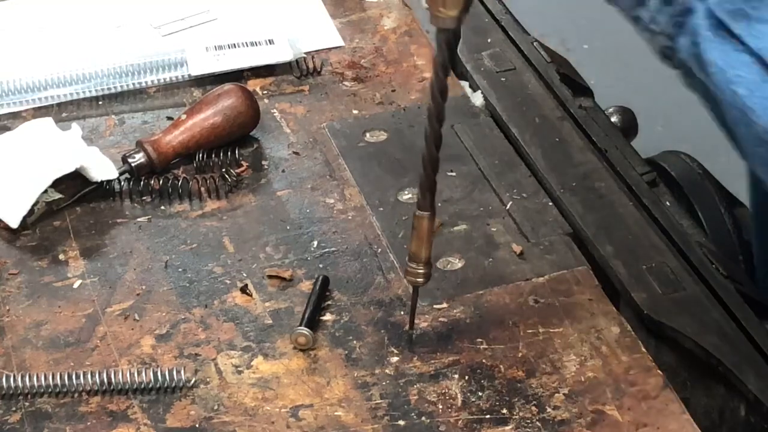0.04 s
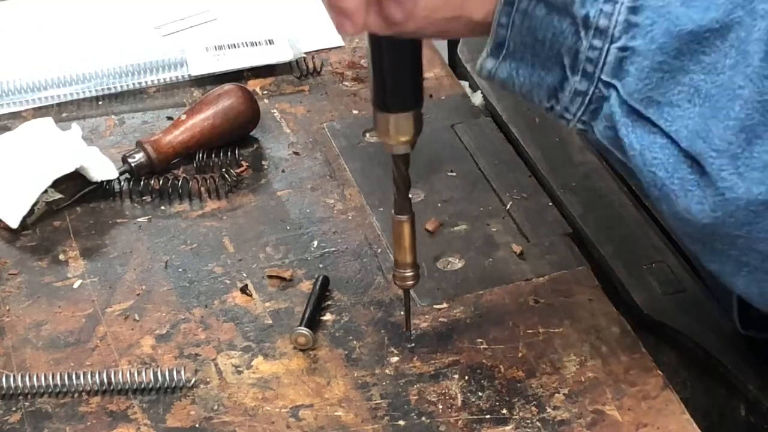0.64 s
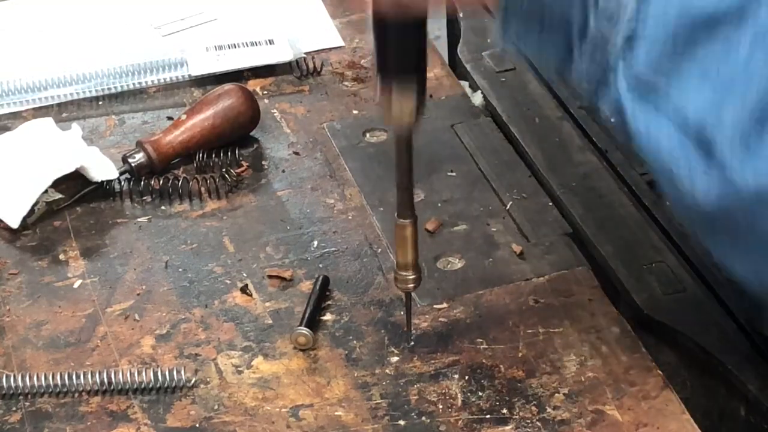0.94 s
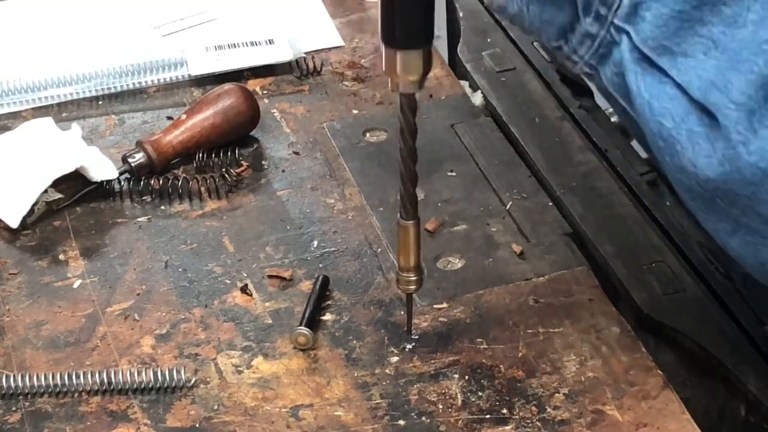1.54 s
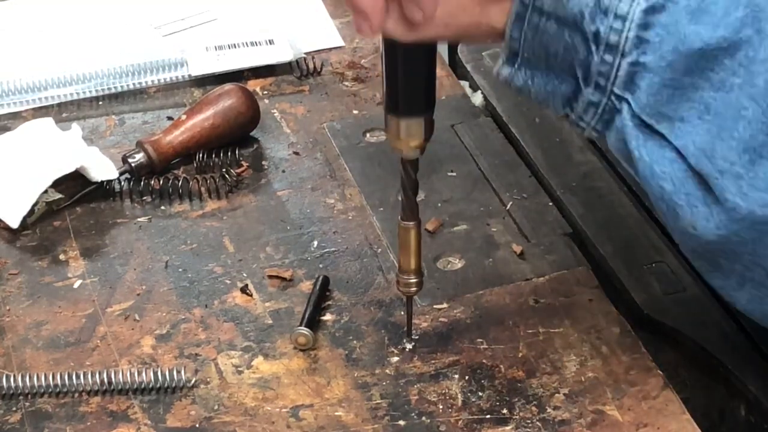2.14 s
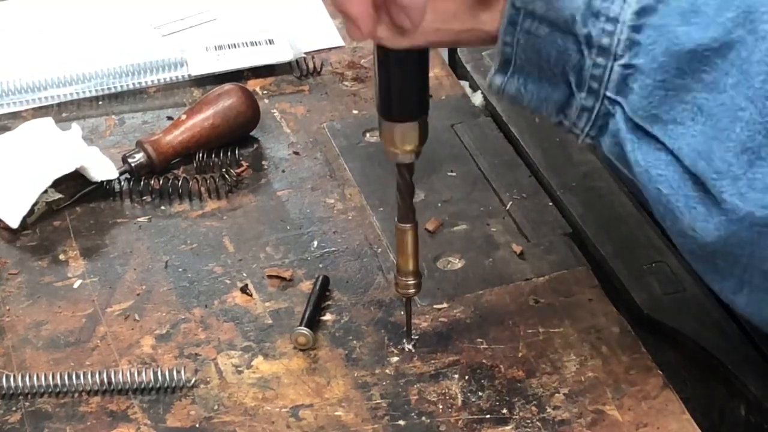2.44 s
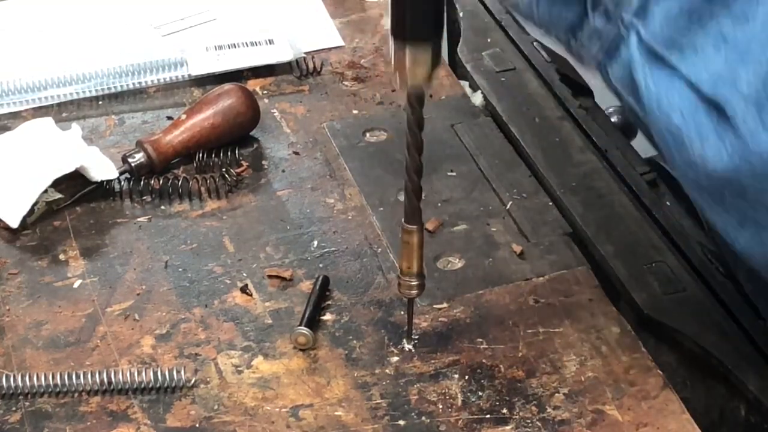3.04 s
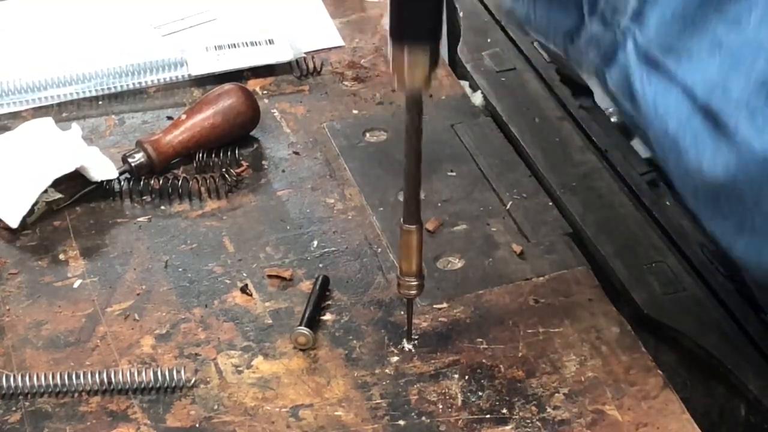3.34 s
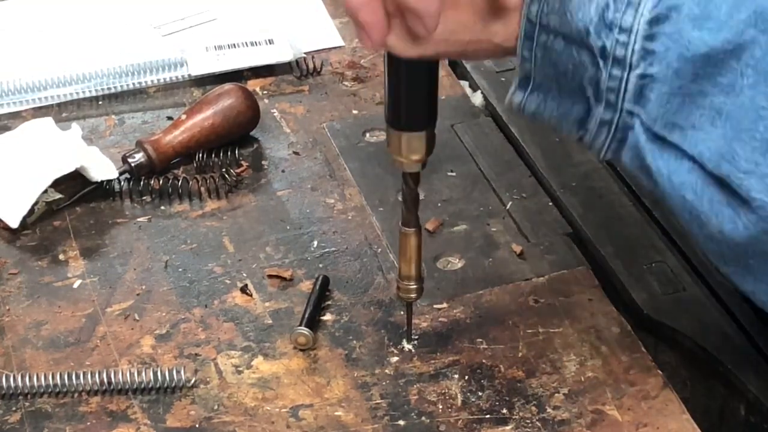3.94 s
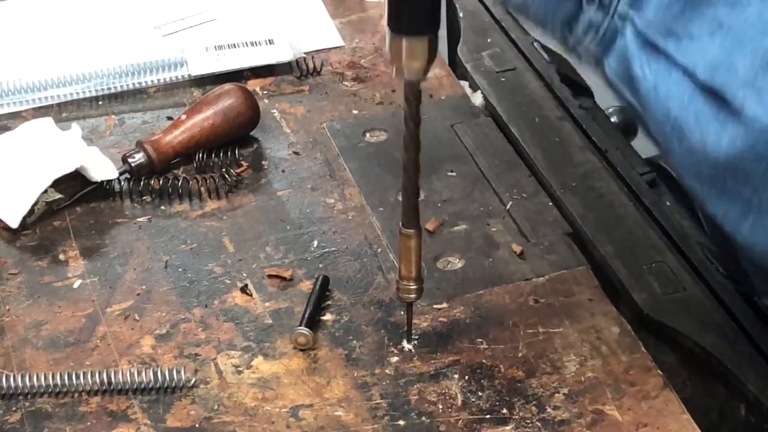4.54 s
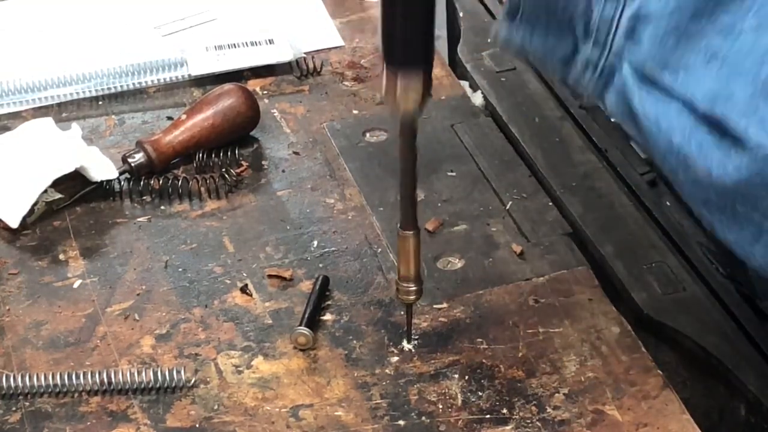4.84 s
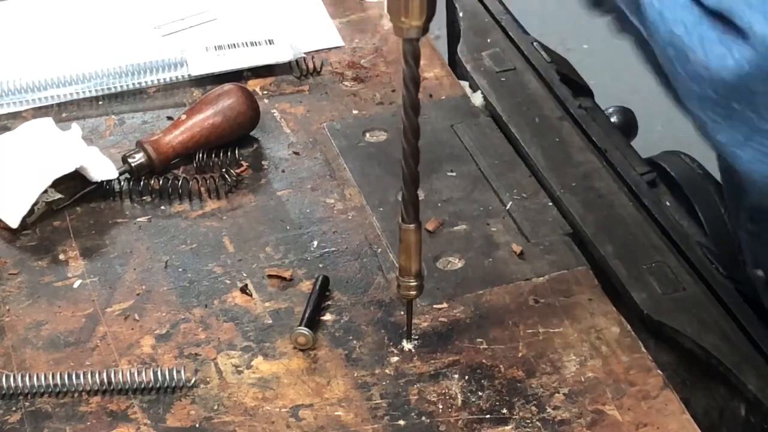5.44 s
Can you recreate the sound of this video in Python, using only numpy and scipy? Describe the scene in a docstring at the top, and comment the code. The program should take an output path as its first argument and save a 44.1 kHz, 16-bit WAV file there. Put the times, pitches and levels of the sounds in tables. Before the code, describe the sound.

Rapid metallic clicking, wooden knocking and gritty grinding from a hand push drill boring into a workbench, then its handle snaps back with a clang.

```python
"""Steel clicks, wooden knocks and gritty scrapes go back and forth: a push drill bores into a bench top.
Each time the handle changes direction, a loose nut inside clicks and the bench knocks. Then the nut
scrapes along a spiral shaft while the bit grinds the wood. At the end a spring throws the handle
against its stop with a clang. It all sounds close by, in a small workshop with a soft, steady hush."""
import sys
import numpy as np
from scipy import signal
from scipy.fft import rfft, irfft
from scipy.io import wavfile
from scipy.ndimage import uniform_filter1d

SR = 44100
rng = np.random.default_rng(int(sys.argv[2]) if len(sys.argv) > 2 else 0)


def transcribe(signal):
    """Save signal, clipped to [-1, 1], as a 16-bit WAV file at the path in sys.argv[1]."""
    frames = np.atleast_2d(signal).T
    limited = np.clip(frames, -1, 1)
    pcm = np.round(limited * 32767).astype(np.int16)
    wavfile.write(sys.argv[1], SR, pcm)


N = 251615

# When things happen. Levels are relative: the functions add their own gains.
# The handle turns to go down (push) or up (return): time_s, tick_db, pitch_hz, clack_db, thud_db, length_s
PUSH_STROKES = [(0.162, -22.5, 4000, -38, -21, .13), (0.8902, -27, 4300, -31.5, -30, 0.14),
                (1.259, -14.5, 4460, -25, -26, 0.12), (1.6281, -5, 5080, -25, -24, 0.097),
                (1.9918, -2.5, 5160, -22.5, -24, .1), (2.333, -9, 4570, -24.5, -31, 0.14),
                (2.6927, -13, 4760, -30, -22.5, .14), (3.0545, -4.5, 4510, -22, -21.5, .15),
                (3.4316, -9.5, 4640, -20.5, -23, .13), (3.816, -11, 4650, -22.5, -26, .17),
                (4.219, -15, 4560, -30.5, -21, .14), (4.6024, -10, 4550, -22.5, -26.5, 0.14),
                (4.961, -8.5, 4540, -21, -24, .16)]
RETURN_STROKES = [(0.6846, -15.5, 3630, -42, -29.5, 0.16), (1.088, -21, 4050, -27.5, -25.5, 0.13),
                  (1.452, -17.5, 5320, -27.5, -23.5, 0.1), (1.817, -22, 5200, -32.5, -24, .11),
                  (2.171, -24, 3680, -26, -19, 0.14), (2.5369, -20, 5100, -24, -19, 0.16),
                  (2.8905, -23.5, 5200, -31.5, -23.5, .17), (3.2637, -16, 3650, -19.5, -20, .16),
                  (3.644, -10.5, 3640, -19, -25, 0.16), (4.0282, -8.5, 4400, -20, -19, 0.17),
                  (4.4359, -12.5, 3900, -20.5, -23.5, .17), (4.7919, -14, 4070, -18.5, -24, 0.18),
                  (5.1908, -6, 4180, -19.5, -17.5, .19)]
# The nut slides without changing direction: time_s, scrape_db, length_s
GENTLE_SLIDES = [(0.124, -52.5, 0.11), (0.452, -43.5, 0.2), (5.238, -40, 0.089), (5.559, -43.5, 0.14)]
# Loose parts touch: start_s, tick_db, clack_db
LOOSE_TICKS = [(0.154, -37, -53), (0.304, -31, -48), (0.4404, -33, -51), (0.9048, -15.5, -38),
               (1.265, -22, -44), (1.6037, -19.5, -56), (1.813, -31, -28), (1.886, -29.5, -51),
               (1.977, -21.5, -51), (1.9967, -10, -15), (2.3785, -24, -39), (2.7355, -17.5, -31),
               (3.0856, -19, -42), (4.941, -20, -29), (5.5175, -32, -32), (5.5456, -27, -31),
               (5.5893, -47, -19.5), (5.5938, -35, -21)]
# The arm or the tool jolts the whole bench: start_s, level_db
BENCH_JOLTS = [(.158, -35), (5.298, -14.5), (5.565, -29.5)]
# The dry spindle (the turning shaft) squeaks: start_s, length_s, pitch_hz, level_db
SPINDLE_SQUEAKS = [(0.672, 0.033, 1770, -28), (0.933, 0.011, 1870, -32)]
# The handle hits its stop and bounces: start_s, level_db
STOP_HITS = [(5.2956, 4.5), (5.3054, -9), (5.3125, -8), (5.3192, -9), (5.359, -11.5)]
# The hand leans on the tool, drills, then lifts the bit out: time_s, load_db
HAND_LOAD = [(.2, -11.5), (.55, 0), (2.0, 1.5), (2.8, -2.5), (4.3, 0), (5.05, -5), (5.2, -6), (5.6, -19)]

# Modes are the notes a struck object rings at: pitch_hz, level_db, fade_s (the time to fall by 60 dB)
BENCH_TOP_MODES = [(129.3, -29.5, 0.99), (158.5, -23.5, 0.19), (235, -11.5, 0.3), (262.2, -15.5, 0.36),
                   (306.6, -14, 0.34), (388, -7, 0.28), (405.4, -2.5, 0.16), (476.1, -1.5, 0.11),
                   (507, -8.5, 0.18), (611, -11.5, 0.099), (667, -1, 0.062), (770, -40, 0.07),
                   (838.6, -6, 0.092), (977, -21.5, 0.055), (1010, -24, 0.035), (1243, -13.5, 0.081)]
BENCH_FRAME_MODES = [(78, -28, 0.44), (128, -3, 0.27), (167.5, -2, 0.14), (217.3, 4, 0.18), (279, -7, 0.13),
                     (332, -3, 0.061), (391, 7.5, 0.11), (458, 7.5, 0.074), (634, 3.5, 0.099)]
WHOLE_TOOL_MODES = [(1510, -21, 0.11), (1980, -15.5, .18), (2100, 6, .11), (2120, 2, 0.24),
                    (2274, 9.5, 0.11), (3330, 8, 0.065), (5700, -6, .13), (6070, -10, .13), (6330, -6, 0.2),
                    (7300, -11, .14), (11200, -21, .15)]

# A spectrum says how strong a sound is from low to high: frequency_hz, level_db
HUSH_SPECTRUM = [(15, -30), (25, -22.5), (107, 9), (160, -0.5), (445, -2), (1300, -8.5), (2060, -10),
                 (2240, -13), (2770, -12), (5430, -16), (5890, -12.5), (6740, -17.5), (15500, -21.5)]  # the quiet workshop
ROCKING_SPECTRUM = [(25, -39.5), (58, -8), (74, 3), (86, -18), (112, -13), (130, -0.5), (240, -10.5),
                    (400, -10), (1000, -55)]  # the bench rumbling under the arm
DOWN_SCRAPE_SPECTRUM = [(300, -16), (900, -4.5), (1450, -4.5), (1900, 1.5), (2650, -4), (3500, -2.5),
                        (4600, -5), (6600, -12), (9500, -15.5), (13000, -19), (16000, -26)]  # the nut sliding down the spiral
UP_SCRAPE_SPECTRUM = [(300, 5), (900, -1.5), (1450, -3.5), (2000, 5), (2650, -3.5), (4500, -4.5),
                      (6600, -12), (9500, -15), (13000, -18.5), (16000, -25)]  # the nut sliding back up
CHIP_SPECTRUM = [(80, -37), (170, -15), (400, 9), (600, -2), (900, 3.5), (1250, -11.5), (1700, -1),
                 (4000, -54)]  # wood chips crunching
SNAP_SPECTRUM = [(1000, -49), (3500, -12), (5500, 2), (8000, -1), (11000, -0.5), (16000, -1.5)]  # the sharp tick of a loose part
SLEEVE_SPECTRUM = [(500, -41), (1100, -23), (1500, -3.5), (1750, -3), (2080, 2.5), (2450, -5), (3200, -11),
                   (6000, -33)]  # the clack of the sleeve around the shaft
SHAFT_SPECTRUM = [(900, -41), (2800, -4.5), (4400, -4), (5400, 2.5), (6500, -4.5), (8300, -10),
                  (9900, -6.5), (11500, -18.5), (13500, -15.5), (16000, -29)]  # the tick of the steel shaft
CHATTER_SPECTRUM = [(800, -13), (2200, -1), (6000, -1.5), (16000, -13)]  # the loose nut chattering
SPRING_SPECTRUM = [(400, 2), (1300, -6), (2100, -7), (2800, -3), (4200, -7.5), (6000, -4), (8500, -12.5),
                   (12000, -11), (16000, -29)]  # the coil spring rattling
WHIRR_SPECTRUM = [(430, -45), (640, 3.5), (730, -0.5), (830, 5.5), (1030, 2.5), (1240, 0.0),
                  (1450, -13.5), (3000, -55)]  # the spindle buzzing
CRACK_SPECTRUM = [(500, -17.5), (3000, 2.0), (10000, -5), (16000, -7.5)]  # steel hitting steel

# How long the workshop's echo takes to fall by 60 dB: frequency_hz, fade_s
ROOM_FADE = [(80, 1), (200, 0.88), (500, 0.3), (2000, 0.22), (6000, 0.25), (15000, 0.19)]

BRIGHTEN, FIRM_TICK_DB = 0.34, -10.5  # a tick tilts brighter by 0.34 dB an octave for each dB above firm
WHIRR_PER_CLACK, FIRM_CLACK_DB = 1.52, -20.5  # dB per dB: a harder turn flings the spindle round faster
SCRAPE_PER_LOAD = 0.58  # dB per dB: the spring keeps the nut rubbing even under a light hand


def amp(db):
    """Turns decibels into a number to multiply by."""
    return 10 ** (np.asarray(db) / 20)


def unit(x):
    """Scales a signal to an average (rms) level of 1."""
    return x / np.sqrt(np.mean(x ** 2) + 1e-20)


def read(table, hz):
    """Looks up a value between a table's rows, with octaves evenly spaced."""
    table_hz, value = np.transpose(table)
    return np.interp(np.log(hz + 1), np.log(table_hz + 1), value)


def add(mix, start_s, sound):
    """Mixes a sound in at the given time."""
    part = mix[max(round(start_s * SR), 0):][:len(sound)]
    part += sound[:len(part)]


def colour(x, spectrum):
    """Shapes a steady noise with a spectrum, at an average level of 1."""
    hz = np.fft.rfftfreq(len(x), 1 / SR)
    return unit(irfft(rfft(x) * amp(read(spectrum, hz)), len(x)))


def load_db(time_s):
    """How hard the hand presses the bit into the wood."""
    return np.interp(time_s, *np.transpose(HAND_LOAD))


def grains(per_s, spread_db):
    """Tiny slips at random moments, a few of them large."""
    size = amp(spread_db * np.minimum(rng.exponential(1, N), 4))
    return size * rng.choice([-1., 1.], N) * (rng.random(N) < per_s / SR)


def ring(modes, detune, spread_db, tilt_db=0, travel_s=0):
    """A struck object rings, a little differently each time; tilt_db is the boost for each octave up."""
    hz, db, fade_s = np.transpose(modes)[:, :, None]
    delay_s = travel_s * np.sqrt(hz.mean() / hz)  # low bending waves travel slower and arrive late
    t = np.maximum(np.arange(SR // 2) / SR - delay_s, 0)
    shift, weight, side = rng.standard_normal((3, len(hz), 1))
    size = amp(db + spread_db * weight + tilt_db * np.log2(hz / hz.mean()))
    tones = np.sign(side) * np.sin(2 * np.pi * hz * (1 + detune * shift) * t)
    build_up = 1 - np.exp(-2 * (hz * t) ** 2)  # each note takes about a cycle to get going
    return (size * build_up * amp(-60 * t / fade_s) * tones).sum(0) / np.linalg.norm(size)


def tap(spectrum, ripple_db, rough_db, rough_s):
    """One dry tap, a little different each time, roughened as the two surfaces grate."""
    hz = np.fft.rfftfreq(2048, 1 / SR)
    ripple = unit(uniform_filter1d(rng.standard_normal(len(hz)), size=40))
    log_gain = np.log(amp(read(spectrum, hz) + ripple_db * ripple))
    # turn the spectrum into a pulse with its energy at the very start (minimum phase)
    mirrored = np.concatenate([log_gain, log_gain[-2:0:-1]])
    pulse = np.fft.ifft(np.exp(np.conj(signal.hilbert(mirrored)))).real
    contact = rng.standard_normal(len(pulse)) * np.exp(-np.arange(len(pulse)) / SR / rough_s)
    contact *= amp(rough_db) / np.linalg.norm(contact)
    contact[0] += 1  # the clean first touch
    sound = signal.fftconvolve(contact, pulse)[:len(pulse)]
    return sound / np.linalg.norm(sound)


def background():
    """The bench rumbles softly as it rocks under the arm, and the room has a steady hush."""
    rocking = colour(rng.standard_normal(N), ROCKING_SPECTRUM)
    hush = colour(rng.standard_normal(N), HUSH_SPECTRUM)
    return amp(-54) * rocking + amp(-54.5) * hush


def nut_scrape(spectrum):
    """The brass nut slips along steel grooves; the tone shifts as the touching point moves."""
    bands = signal.stft(grains(per_s=5500, spread_db=3.2), SR, nperseg=256)[2]
    patches = uniform_filter1d(rng.standard_normal(bands.shape), size=3, axis=0)  # smooth across pitch
    shift_db = 3 * unit(uniform_filter1d(patches, size=7, axis=1))  # and across time
    slips = signal.istft(bands * amp(shift_db), SR, nperseg=256)[1][:N]
    return colour(slips, spectrum)


def bit_grind(tilt_db):
    """The cutting edges catch on wood fibres and shake the bench; chips crunch."""
    catches = grains(per_s=930, spread_db=2.5)
    bench = ring(BENCH_TOP_MODES, detune=0.011, spread_db=0.5, tilt_db=tilt_db)
    shaking = unit(signal.oaconvolve(catches, bench)[:N])
    chips = colour(grains(per_s=1200, spread_db=4), CHIP_SPECTRUM)
    return unit(shaking + amp(-8) * chips)


def slides():
    """The nut slides gently: scraping and grinding swell and fade without a click."""
    scrape, grind = np.zeros((2, N))
    for s, scrape_db, length_s in GENTLE_SLIDES:
        arch = np.sqrt(np.hanning(int((length_s + 0.021) * SR)))
        add(scrape, s - 0.03, amp(scrape_db) * arch)
        add(grind, s - 0.03, amp(-35 + load_db(s + length_s / 2)) * arch)
    return scrape * nut_scrape(DOWN_SCRAPE_SPECTRUM) + grind * bit_grind(tilt_db=-3.5)


def stroke(length_s, lead_s, lead_db, sag_db, start_db):
    """The loudness of one stroke: a light touch, then full rubbing that speeds up and slows to rest."""
    t = np.arange(-lead_s, length_s, 1 / SR)
    progress = np.clip(t / length_s, 0, 1)
    contact = np.interp(t, [-lead_s, -lead_s * 0.92, -0.003, 0.003],
                        [0, amp(lead_db - 6), amp(lead_db - 1.5), 1])
    slowing = np.sqrt(np.clip(1 - progress ** 4, 0, 1)) ** 3
    return contact * amp(start_db * (1 - progress) ** 4 - sag_db * progress) * slowing


def pumping(strokes, scrape_spectrum, click_db, ring_db, thud_tilt_db, whirr_db, whirr_s,
            lead_s, lead_db, start_db, scrape_db, scrape_sag_db, grind_db, grind_sag_db, grind_tilt_db):
    """All strokes one way: a click, thud and whirr, then scraping and grinding that follow the load."""
    hits, scrape, grind = np.zeros((3, N))
    for s, tick_db, pitch_hz, clack_db, thud_db, length_s in strokes:
        add(hits, s, amp(click_db) * steel_click(tick_db, pitch_hz, clack_db, ring_db))
        thud = ring(BENCH_TOP_MODES, detune=0.035, spread_db=3, tilt_db=thud_tilt_db, travel_s=0.0012)
        add(hits, s, amp(thud_db) * thud)
        add(hits, s, amp(whirr_db + WHIRR_PER_CLACK * (clack_db - FIRM_CLACK_DB)) * whirr(whirr_s))
        scrape_shape = stroke(length_s, lead_s, lead_db, scrape_sag_db, start_db)
        grind_shape = stroke(length_s, lead_s, lead_db, grind_sag_db, start_db)
        add(scrape, s - lead_s, amp(scrape_db + SCRAPE_PER_LOAD * load_db(s)) * scrape_shape)
        add(grind, s - lead_s, amp(grind_db + load_db(s)) * grind_shape)
    return hits + scrape * nut_scrape(scrape_spectrum) + grind * bit_grind(grind_tilt_db)


def loose_parts():
    """Loose parts touch, each time with a sharp snap and a lower clack."""
    out = np.zeros(N)
    for s, tick_db, clack_db in LOOSE_TICKS:
        add(out, s, amp(tick_db + 6.5) * tap(SNAP_SPECTRUM, ripple_db=1.5, rough_db=-5, rough_s=0.0005))
        add(out, s, amp(clack_db + 13) * tap(SLEEVE_SPECTRUM, ripple_db=8, rough_db=1, rough_s=0.0031))
    return out


def jolts():
    """The heavy bench frame is slow to move, so each jolt swells into a low boom."""
    out = np.zeros(N)
    t = np.arange(SR // 2) / SR
    swell = 1 - np.exp(-(t / 0.0074) ** 2)
    for s, db in BENCH_JOLTS:
        add(out, s, amp(db) * swell * ring(BENCH_FRAME_MODES, detune=0.0046, spread_db=1.5))
    return out


def steel_click(tick_db, pitch_hz, clack_db, ring_db):
    """The shaft ticks and rings at a pitch set by where the nut sits; the sleeve clacks lower."""
    tilt_db = BRIGHTEN * (tick_db - FIRM_TICK_DB)
    spectrum = [(hz, db + tilt_db * np.log2(hz / pitch_hz)) for hz, db in SHAFT_SPECTRUM]
    tick = tap(spectrum, ripple_db=3, rough_db=4.5, rough_s=0.0016)
    t = np.arange(len(tick)) / SR
    fade = np.exp(-t / 0.00096) - np.exp(-t / 0.00025)  # the hand's grip soon stops the ringing
    ringing = fade * np.sin(2 * np.pi * pitch_hz * t)
    clack = tap(SLEEVE_SPECTRUM, ripple_db=4, rough_db=1, rough_s=0.0036)
    return amp(tick_db + 10.5) * tick + amp(tick_db + ring_db) * ringing + amp(clack_db + 21.5) * clack


def whirr(rise_s):
    """The spindle spins up in its seat and buzzes for a moment."""
    rise = np.arange(SR // 4) / SR / rise_s
    buzz = colour(rng.standard_normal(len(rise)), WHIRR_SPECTRUM)
    return buzz * rise ** 2 * np.exp(2 * (1 - rise))


def nut_chatter():
    """The loose nut ticks faintly at random in its grooves, louder as the hand presses harder."""
    clicks = grains(per_s=7.9, spread_db=2.5) * amp(-33.5 + load_db(np.arange(N) / SR))
    tick = tap(CHATTER_SPECTRUM, ripple_db=1, rough_db=-12, rough_s=0.001)
    return signal.oaconvolve(clicks, tick)[:N]


def sleeve_knocks(early_s, knock_db):
    """As the hand eases off, just before each return, the sleeve knocks loose."""
    out = np.zeros(N)
    for s, *_ in RETURN_STROKES:
        knock = tap(SLEEVE_SPECTRUM, ripple_db=2, rough_db=4, rough_s=0.005)
        add(out, s - early_s, amp(knock_db) * knock)
    return out


def squeaks():
    """Dry steel sticks and slips for a moment: a wavering tone plus the octave above it."""
    out = np.zeros(N)
    for s, length_s, hz, db in SPINDLE_SQUEAKS:
        arch = np.hanning(int(length_s * SR))
        waver = unit(uniform_filter1d(rng.standard_normal(len(arch)), size=100))
        phase = 2 * np.pi * np.cumsum(hz * (1 + 0.041 * waver)) / SR
        add(out, s, amp(db) * arch * (np.sin(phase) + amp(-7) * np.sin(2 * phase)))
    return out


def handle_slam():
    """The spring slams the handle home and rattles; bounces after the clang keep the tool ringing."""
    out = np.zeros(N)
    t = np.arange(SR // 2) / SR
    start_s, clang_hz = STOP_HITS[0][0], 2030
    clang = np.sin(2 * np.pi * clang_hz * t) * np.exp(-t / 0.0025) * (1 - np.exp(-t / 0.00076))
    add(out, start_s, steel_click(tick_db=0, pitch_hz=5290, clack_db=-9.5, ring_db=2))
    crack = colour(rng.standard_normal(len(t)), CRACK_SPECTRUM) * np.exp(-t / 0.0025)
    for s, db in STOP_HITS:
        add(out, s, amp(db - 20) * ring(WHOLE_TOOL_MODES, detune=0.002, spread_db=0))
        add(out, s, amp(db) * steel_click(tick_db=-11.5, pitch_hz=5400, clack_db=-23, ring_db=-8))
    spring_rattle = nut_scrape(SPRING_SPECTRUM)[:len(t)] * np.exp(-t / 0.037)  # the same gritty texture
    add(out, start_s, amp(9.5) * clang + amp(-4) * crack + amp(-21.5) * spring_rattle)
    return out


def reflections():
    """Many small echoes at random times; low and high pitches fade at their own speeds."""
    slots = np.arange(220, SR - 20, 20)
    echoes = np.zeros(SR)
    echoes[slots + rng.integers(0, 20, len(slots))] = rng.choice([-1., 1.], len(slots))
    hz, t, bands = signal.stft(echoes, SR, nperseg=256)
    fade = amp(-60 * t / read(ROOM_FADE, hz)[:, None])
    tail = signal.istft(bands * fade, SR, nperseg=256)[1]
    return tail / np.linalg.norm(tail)


def workshop_echo(sound):
    """The short echo drifts between two sets of reflections, so each click rings a little differently."""
    drift = 2 * np.pi * np.arange(N) / SR / 1.7  # one cycle every 1.7 s
    shares = np.cos(drift), np.sin(drift)
    return sum(signal.oaconvolve(sound * share, reflections())[:N] for share in shares)


def scene():
    """Mixes the drill, its echo and the background into one channel."""
    down = pumping(PUSH_STROKES, DOWN_SCRAPE_SPECTRUM, click_db=-3.5, ring_db=5, thud_tilt_db=-3,
                   whirr_db=-45, whirr_s=0.053, lead_s=0.028, lead_db=-12, start_db=-5,
                   scrape_db=-36, scrape_sag_db=10.5,
                   grind_db=-31.5, grind_sag_db=2.5, grind_tilt_db=-0.4)
    up = pumping(RETURN_STROKES, UP_SCRAPE_SPECTRUM, click_db=-1, ring_db=-3, thud_tilt_db=6,
                 whirr_db=-31, whirr_s=0.014, lead_s=0.023, lead_db=-5, start_db=-0.4,
                 scrape_db=-35.5, scrape_sag_db=20,
                 grind_db=-33.5, grind_sag_db=15, grind_tilt_db=-4.5)
    drill = down + up + sleeve_knocks(early_s=0.025, knock_db=-22.5) + nut_chatter()
    drill += loose_parts() + jolts() + slides() + squeaks() + handle_slam()
    return (drill + background() + amp(-12.5) * workshop_echo(drill))[None]


def record(dry):
    """Flattens the loudest peaks, then cuts the bass below 48 Hz and the treble above 15850 Hz."""
    clipped = np.clip(dry, -1.05, 1.05)
    thinned = signal.sosfilt(signal.butter(4, 48, "high", fs=SR, output="sos"), clipped)
    treble_cut = signal.firwin(255, 15850, window=("kaiser", 8), fs=SR)
    return signal.oaconvolve(thinned, treble_cut[None], "same")


dry = scene()
out = record(dry)
transcribe(out)
```